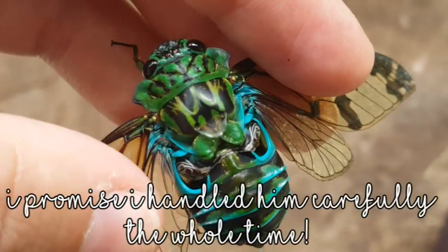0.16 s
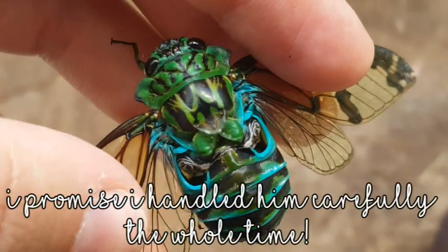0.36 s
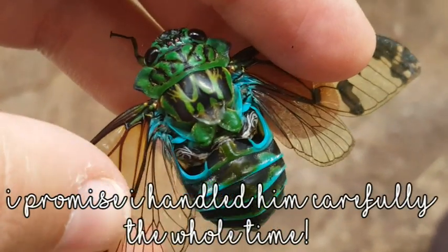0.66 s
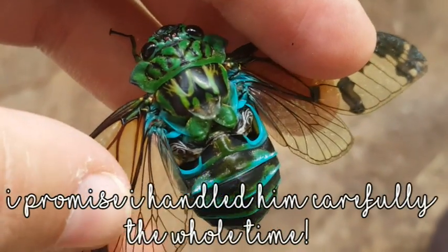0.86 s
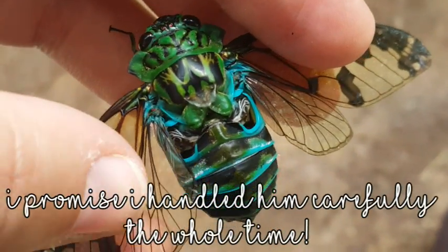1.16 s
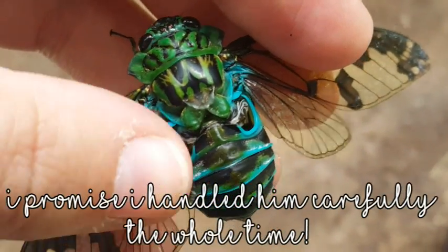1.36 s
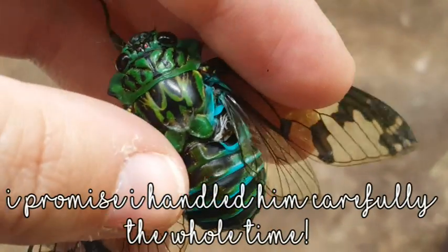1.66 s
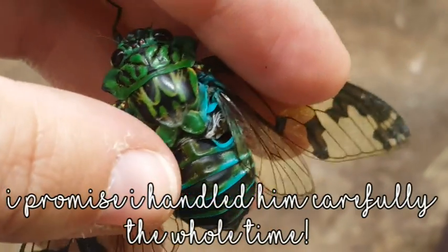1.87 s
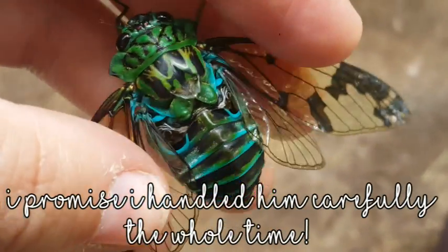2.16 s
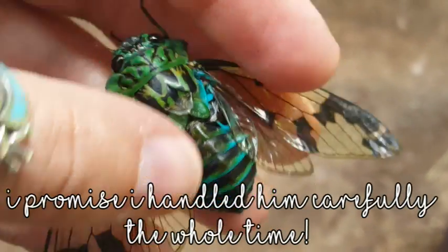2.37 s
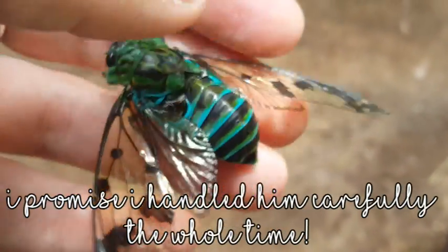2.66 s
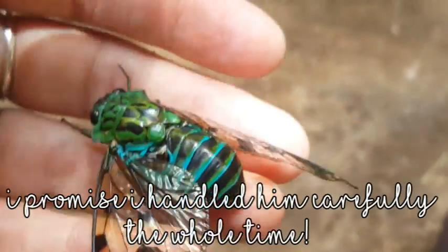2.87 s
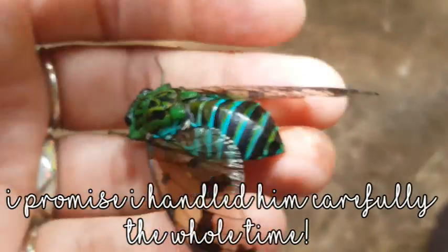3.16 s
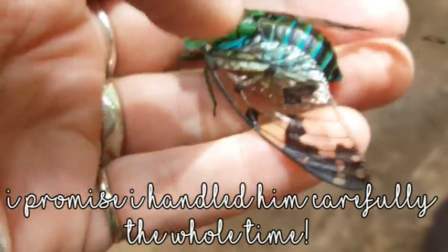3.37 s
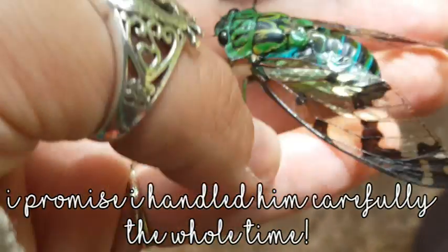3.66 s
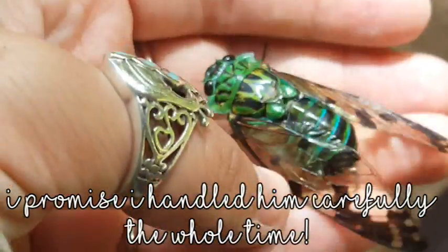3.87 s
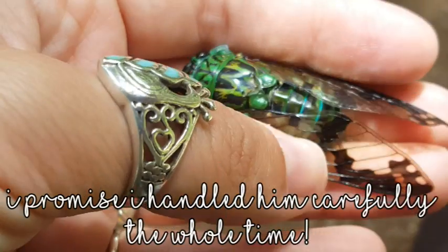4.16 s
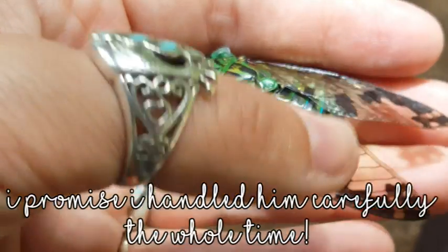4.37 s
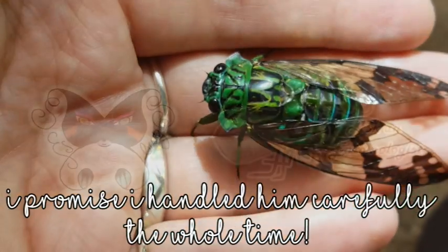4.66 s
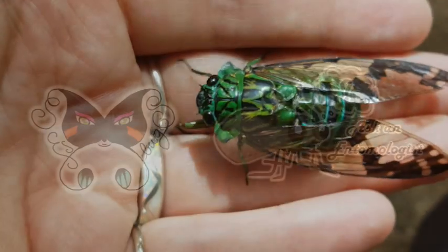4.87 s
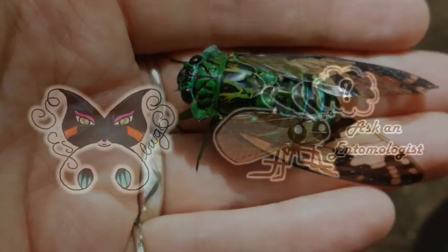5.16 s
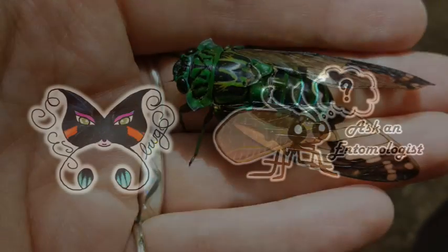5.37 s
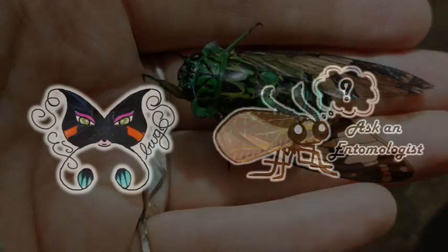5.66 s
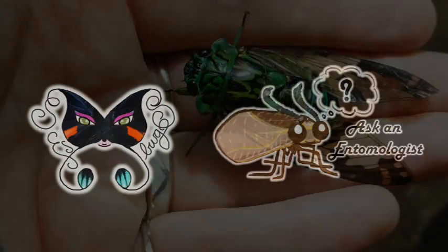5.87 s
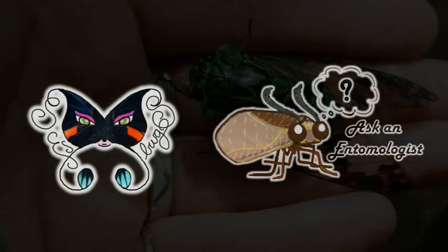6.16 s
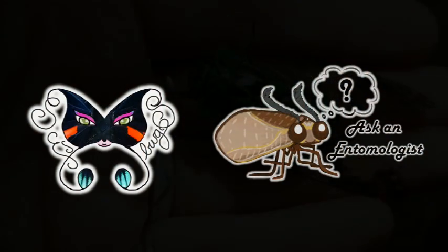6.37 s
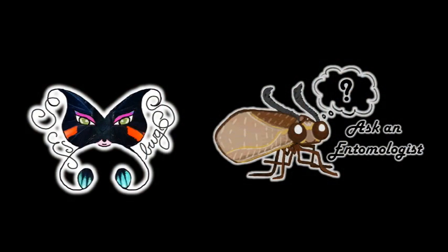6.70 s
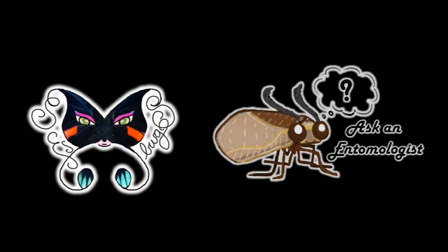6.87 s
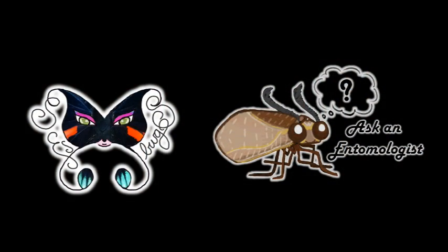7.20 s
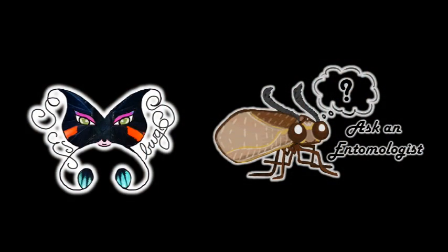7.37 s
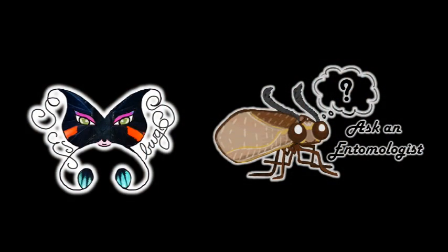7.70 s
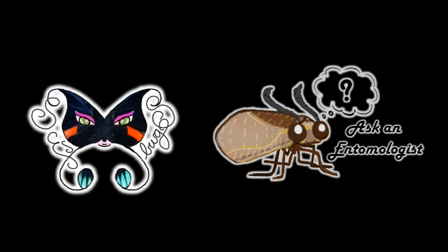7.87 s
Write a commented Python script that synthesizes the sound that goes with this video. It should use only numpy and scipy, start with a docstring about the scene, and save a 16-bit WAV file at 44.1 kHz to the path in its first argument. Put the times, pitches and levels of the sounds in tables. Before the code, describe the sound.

Outdoors, a chorus of cicadas buzzes all around a stereo pair of microphones, the near ones shrill and ringing, the far ones merging into hiss. Two faint high whistles sound at the start. The chorus swells, holds, then eases a little, with higher insects sizzling above it. Underneath lie a soft distant hum and a deeper rumble that stops abruptly near the end.

```python
"""A chorus of cicadas swells and ebbs all around a spaced pair of microphones, outdoors.
Each insect buckles its drums hundreds of times a second and its body rings; the near ones buzz,
the far ones merge into hiss. Higher insects sizzle above them, and two faint whistles sound at the start.
Underneath lie a soft distant hum and a deeper rumble that stops abruptly near the end."""
import sys
import numpy as np
from scipy import signal
from scipy.fft import rfft, irfft, next_fast_len
from scipy.io import wavfile
from scipy.ndimage import uniform_filter1d

SR = 44100
rng = np.random.default_rng(int(sys.argv[2]) if len(sys.argv) > 2 else 0)


def persist_wave(psi):
    """Save psi, clipped to +-1, as 16-bit WAV."""
    counts = np.round(np.clip(psi, -1, 1) * 32767).astype(np.int16)
    wavfile.write(sys.argv[1], SR, np.atleast_2d(counts).T)


N = 354563
TIME_S = np.arange(N) / SR
FFT_SIZE = next_fast_len(N)
BIN_HZ = np.fft.rfftfreq(FFT_SIZE, 1 / SR)


def gain_of(db):
    return 10 ** (np.asarray(db) / 20)


def unit_rms(x):
    return x / np.sqrt(np.mean(x ** 2) + 1e-20)


def over_time(rows):
    """Rows of (seconds, value), read at every sample."""
    return np.interp(TIME_S, *np.transpose(rows))


def over_frequency(rows):
    """Rows of (Hz, dB), read at every bin along a log frequency axis."""
    hz, db = np.transpose(rows)
    return np.interp(np.log(BIN_HZ + 1), np.log(hz + 1), db)


def coloured(x, spectrum):
    """Filters x by a spectrum and sets it to rms 1."""
    shaped = rfft(x, FFT_SIZE) * gain_of(over_frequency(spectrum))
    return unit_rms(irfft(shaped, FFT_SIZE)[..., :N])


def heard_by_pair(a, b, coherence, from_left):
    """Two unrelated sounds become left and right: sound from all around is alike only in the bass,
    sound from the left stays alike but reaches the right microphone late."""
    spacing_m, sound_m_per_s, right_lag_s = 0.172, 343, 0.00029
    around = (1 - from_left) * np.sinc(2 * BIN_HZ * spacing_m / sound_m_per_s)
    side = from_left * np.exp(-2j * np.pi * BIN_HZ * right_lag_s)
    alike = coherence * (around + side)
    unlike = np.sqrt(np.clip(1 - abs(alike) ** 2, 0, 1))
    left = rfft(a, FFT_SIZE)
    right = alike * left + unlike * rfft(b, FFT_SIZE)
    return irfft(np.array([left, right]), FFT_SIZE)[:, :N]


def distant_noise(spectrum, start_db, held_db, coherence, from_left, waver_db=0, rise_s=0.33):
    """Far-off noise that rises to its level and holds, wavering slowly by waver_db."""
    noise = heard_by_pair(*rng.standard_normal((2, N)), coherence, from_left)
    waver = unit_rms(uniform_filter1d(uniform_filter1d(rng.standard_normal(N), 4000), 4000))
    level_db = over_time([(0, start_db), (rise_s, held_db)])
    return gain_of(level_db + waver_db * waver) * coloured(noise, spectrum)


# The open air, far off. Each row: frequency in Hz, relative level per Hz in dB.
HUM_SPECTRUM = [(15, -30), (30, -12), (45, -23), (80, -7), (120, -9), (179, -12), (296, -3.5), (450, -7),
                (700, -10), (1230, -15), (2200, -16), (2860, -23), (4840, -100)]


def outdoor_hum():
    """A soft, steady hum that reaches the microphones mostly from all around."""
    return distant_noise(HUM_SPECTRUM, start_db=-59, held_db=-54.5, coherence=0.9, from_left=0.21)


# The rumble in the distance. Each row: frequency in Hz, relative level per Hz in dB.
RUMBLE_SPECTRUM = [(15, -46), (25, -9), (27, -20), (70, -4), (179, -2), (344, -5.5), (530, -10),
                   (1250, -11), (1930, -13), (2200, -14.5), (2860, -16), (4840, -120)]


def distant_rumble(stop_s=6.47, cut_s=0.012):
    """A deeper, slightly wavering noise, partly from the left, that stops abruptly."""
    rumble = distant_noise(RUMBLE_SPECTRUM, start_db=-66, held_db=-51,
                           coherence=0.99, from_left=0.41, waver_db=0.67)
    return rumble * over_time([(stop_s, 1), (stop_s + cut_s, 0)])


# Thin whistles, perhaps a far cricket. Each row: start in seconds, length in seconds,
# opening pitch in Hz, closing pitch in Hz, level in dB.
WHISTLE_NOTES = [(0, 0.405, 5760, 5830, -52), (0.083, .1, 6100, 6060, -56)]


def far_whistles():
    """Short, slightly gliding tones with soft ends, reaching both microphones together."""
    out = np.zeros(N)
    for start_s, length_s, start_hz, end_hz, db in WHISTLE_NOTES:
        hz = np.linspace(start_hz, end_hz, round(length_s * SR))
        tone = np.sqrt(2) * np.sin(2 * np.pi * (np.cumsum(hz) / SR + rng.random()))
        soft_ends = signal.windows.tukey(len(hz), .4)
        out[round(start_s * SR):][:len(hz)] += gain_of(db) * tone * soft_ends
    return out


def insect_clicks(count, click_hz, spread, jitter, t60_s, direct_db, near_db):
    """Insects near the microphones click at their own drifting rates, smeared by leaves and ground
    into a short tail; the countless far ones merge into an even hiss."""
    near = np.zeros((2, N))
    tail_s = np.arange(SR // 4) / SR
    for _ in range(count):
        drift = unit_rms(uniform_filter1d(rng.standard_normal(N // 256 + 2), 40))
        rate_hz = click_hz * (1 + spread * rng.standard_normal() + jitter * np.repeat(drift, 256)[:N])
        cycles = np.floor(np.cumsum(rate_hz) / SR + rng.random())
        clicks = np.diff(cycles, prepend=cycles[0]) * gain_of(2 * rng.standard_normal(N))
        tails = rng.standard_normal((2, len(tail_s))) * gain_of(-60 * tail_s / t60_s)
        tails /= np.linalg.norm(tails[0])
        arrivals = rng.integers(0, 200, 2)  # direct path to each microphone, in samples
        tails[[0, 1], arrivals] += gain_of(direct_db)
        near += signal.fftconvolve(clicks[None], tails, axes=1)[:, :N]
    far = rng.standard_normal((2, N))
    return gain_of(near_db) * unit_rms(near) + far


# The sizzle above the chorus. Each row: frequency in Hz, relative level per Hz in dB.
SIZZLE_SPECTRUM = [(9500, -60), (11200, -29), (12200, -21), (12900, -11), (13600, -8.5), (14200, -4),
                   (14700, 0), (15200, -2), (15700, -4), (17000, -6)]


def high_insects(offset_db=-13.5, swell_share=.9, sag_db_per_s=.5):
    """A higher, thinner buzz that follows the cicadas' swell and sags with time."""
    clicks = insect_clicks(count=5, click_hz=500, spread=.03, jitter=.015,
                           t60_s=0.14, direct_db=-10, near_db=-3)
    level_db = offset_db + swell_share * over_time(CHORUS_SWELL) - sag_db_per_s * TIME_S
    return gain_of(level_db) * coloured(clicks, SIZZLE_SPECTRUM)


# The chorus as it arrives at the microphones. Each row: time in seconds, level in dB.
CHORUS_SWELL = [(0, -36.5), (.15, -34.5), (.4, -30), (.7, -27.5), (1.5, -24.5), (2.6, -22), (4, -21.5),
                (5.6, -22), (6.3, -23.5), (6.55, -23), (7, -24.5), (8.04, -27)]
# The ring of drum and air sac, many bodies together.
# Each row: frequency in Hz, relative level per Hz in dB.
BODY_RESONANCE = [(1300, -72), (1900, -40), (2800, -22), (3050, -16.5), (3300, -4), (3600, -4.5),
                  (3800, -3.5), (4200, -2), (4600, 0), (5100, -5), (6200, -15), (6800, -22.5),
                  (7500, -33.5), (9000, -30.5), (10900, -42.5), (14000, -40)]


def cicadas():
    """Cicadas on every side, near and far, buckle their drums; the clicks ring in their bodies."""
    clicks = insect_clicks(count=6, click_hz=589.4, spread=.02, jitter=.01,
                           t60_s=0.18, direct_db=-2, near_db=-7)
    at_pair = heard_by_pair(*clicks, coherence=0.88, from_left=0.071)
    return gain_of(over_time(CHORUS_SWELL)) * coloured(at_pair, BODY_RESONANCE)


def scene():
    """The insects over the distant background, left and right."""
    background = outdoor_hum() + distant_rumble()
    return background + cicadas() + high_insects() + far_whistles()


# The mismatch of the microphones. Each row: frequency in Hz, left minus right in dB.
PAIR_BALANCE = [(60, 0), (160, 2), (450, 0), (1200, 2), (2000, -0.5), (3300, 0.5), (4400, -4.5),
                (5500, 4.5), (7000, 6.5), (9000, 3), (12000, -1), (15000, .5)]


def record(dry):
    """The two microphones differ a little in colour; the converter adds a steady offset and a band limit."""
    dc_offset, edge_hz = -0.0008, 15745
    half_db = over_frequency(PAIR_BALANCE) / 2
    balanced = rfft(dry, FFT_SIZE) * gain_of([half_db, -half_db])
    pair = irfft(balanced, FFT_SIZE)[:, :N] + dc_offset
    lowpass = signal.firwin(4095, edge_hz, window=("kaiser", 10), fs=SR)
    return signal.oaconvolve(pair, lowpass[None], "same")


dry = scene()
out = record(dry)
persist_wave(out)
```